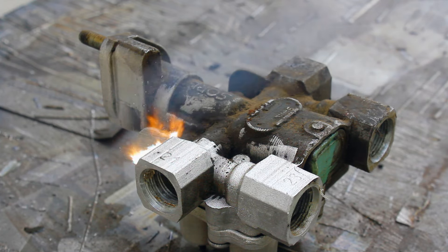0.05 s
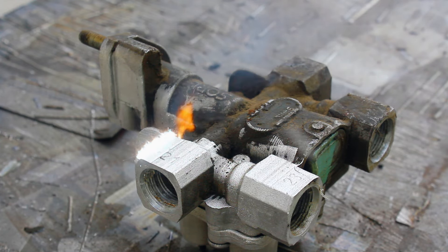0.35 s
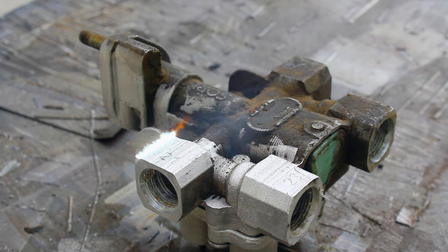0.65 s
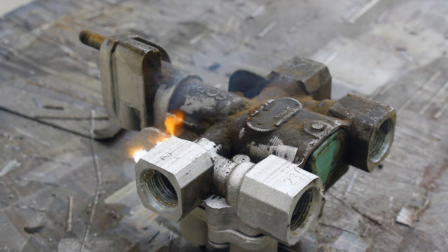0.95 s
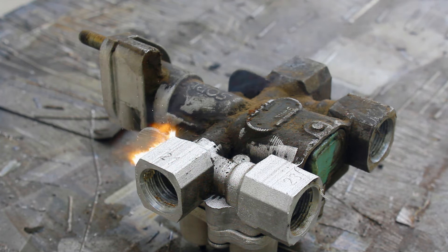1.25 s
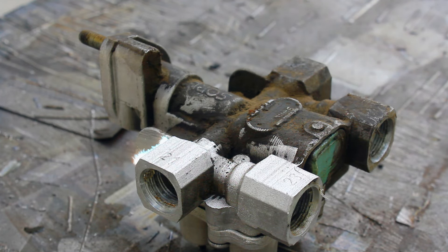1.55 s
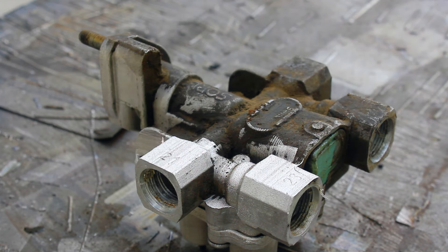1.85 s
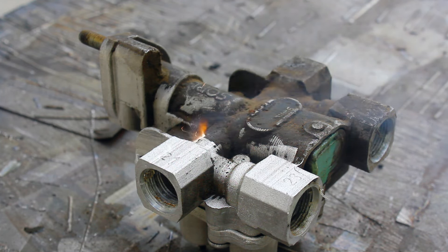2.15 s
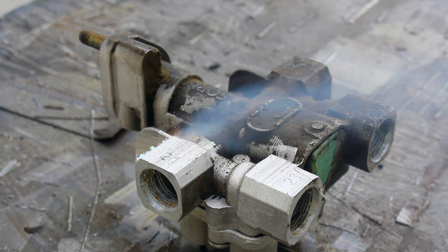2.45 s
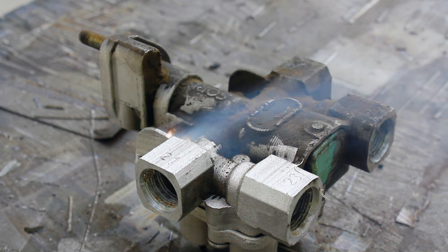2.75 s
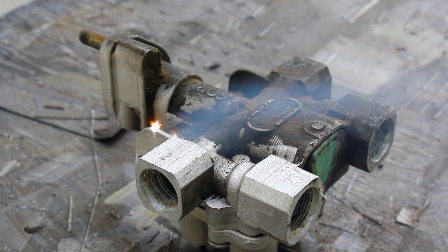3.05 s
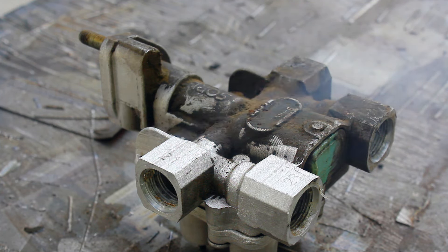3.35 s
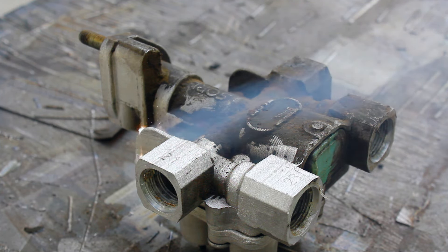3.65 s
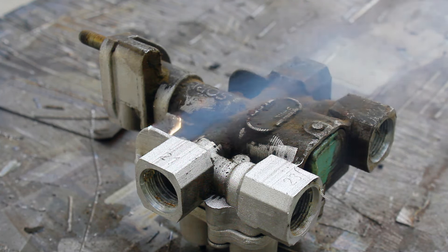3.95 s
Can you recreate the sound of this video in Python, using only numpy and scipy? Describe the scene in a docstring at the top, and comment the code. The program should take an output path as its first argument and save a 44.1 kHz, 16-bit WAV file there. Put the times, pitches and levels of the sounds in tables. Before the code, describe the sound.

Close, buzzing sizzle of a laser burning rust off metal, pausing briefly midway.

```python
"""A bright sizzle and a harsh buzz, close by: a pulsed laser strips rust and paint from a metal valve.
The beam sweeps to and fro 137 times a second. The coating sizzles in tiny bursts, and its vapour pushes
the air on every sweep, making the buzz. Thick spots flare with two puffs per sweep, among sharp cracks.
Midway the beam slips off the valve for a moment, leaving faint ticks and the cooling fan."""
import sys
import numpy as np
from scipy import signal
from scipy.fft import rfft, irfft
from scipy.io import wavfile
from scipy.ndimage import map_coordinates

SR = 44100
rng = np.random.default_rng(int(sys.argv[2]) if len(sys.argv) > 2 else 0)


def dump_mix(stems):
    """Bounce the given channels to the path in sys.argv[1] as a 16-bit WAV at rate SR."""
    frames = np.atleast_2d(stems).T  # one column per channel
    limited = np.clip(frames, -1, 1)  # hard clip at full scale
    pcm = np.round(limited * 32767).astype(np.int16)
    wavfile.write(sys.argv[1], SR, pcm)


N = 176400
T = np.arange(N) / SR
HZ = np.fft.rfftfreq(N, 1 / SR)
SWEEP_HZ = 136.92

# How strongly the coating sizzles. Each row: time in seconds, level in dB.
SIZZLE_LEVEL = [(0, -24), (.03, -24.5), (.1, -20), (.15, -20.5), (.18, -24.5), (.229, -25), (.24, -20),
                (.26, -19), (.31, -21.5), (.34, -23.5), (.365, -20), (.4, -24.5), (.415, -19.5), (.45, -22),
                (.465, -23.5), (.48, -21), (.497, -27), (.51, -18.5), (.55, -27), (.562, -16), (.577, -27),
                (.595, -22), (.62, -21.5), (.635, -26.5), (.66, -18), (.69, -27.5), (.71, -22),
                (.745, -26.5), (.78, -24), (.83, -26.5), (.865, -22), (.89, -25), (.94, -26), (.975, -26),
                (.99, -26.5), (1.01, -20.5), (1.09, -22), (1.14, -27), (1.17, -22.5), (1.26, -25),
                (1.285, -34.5), (1.33, -33), (1.37, -42), (1.385, -33), (1.395, -19), (1.41, -26),
                (1.45, -24.5), (1.498, -32.5), (1.515, -23.5), (1.57, -27), (1.597, -50.5), (1.7, -49),
                (1.76, -85), (1.83, -72), (1.852, -45.5), (1.875, -30), (1.895, -26), (1.945, -31.5),
                (1.965, -28), (2.0, -26), (2.08, -26.5), (2.155, -31), (2.19, -27), (2.23, -26),
                (2.28, -31), (2.325, -30), (2.35, -37.5), (2.41, -31.5), (2.46, -30), (2.48, -23),
                (2.51, -31), (2.6, -31.5), (2.665, -35), (2.7, -36), (2.75, -36.5), (2.79, -31.5),
                (2.83, -38), (2.88, -30), (2.93, -26), (3.0, -31), (3.018, -36.5), (3.06, -29.5),
                (3.11, -40.5), (3.17, -37.5), (3.22, -27.5), (3.265, -31.5), (3.31, -36), (3.34, -58),
                (3.37, -45), (3.4, -33), (3.425, -31.5), (3.48, -29.5), (3.515, -41), (3.57, -28),
                (3.61, -32), (3.652, -39), (3.68, -32), (3.73, -28.5), (3.77, -36.5), (3.85, -37),
                (3.9, -37), (3.93, -25.5), (3.98, -37), (4, -35)]
# The beam moves from a nut's flat face to its edge. Each row: time in seconds, share of the edge.
EDGE_SHARE = [(1.6, 0.071), (2.3, 1)]
# The bright tone of spits, snaps and pops. Each row: frequency in Hz, level in dB.
SPIT_TONE = [(300, -11.5), (1200, -13.5), (3000, 0), (4600, -4.5), (5700, -2.5), (7000, -4.5), (9000, 0.5),
             (11000, -5), (13000, 6), (15500, -0.5)]


def amp(db):
    """Turns decibels into a gain."""
    return 10 ** (np.asarray(db) / 20)


def curve(points):
    """Joins rows of time and value with straight lines."""
    return np.interp(T, *np.transpose(points))


def unit(x):
    """Scales a sound to an average (rms) size of 1."""
    return x / np.sqrt(np.mean(x ** 2) + 1e-20)


def band_unit(x, lo_hz, hi_hz):
    """Scales a sound so that one frequency band has size 1."""
    band = irfft(rfft(x) * ((HZ > lo_hz) & (HZ < hi_hz)), N)
    return x / np.sqrt(np.mean(band ** 2) + 1e-20)


def colour(x, points, size=4096):
    """Shapes a sound's tone to follow rows of Hz and dB."""
    table_hz, db = np.transpose(points)
    hz = abs(np.fft.fftfreq(size, 1 / SR))
    log_gain = np.log(amp(np.interp(np.log(hz + 1), np.log(table_hz + 1), db)) + 1e-6)
    taps = np.fft.ifft(np.exp(np.conj(signal.hilbert(log_gain)))).real[:size // 2]
    return signal.oaconvolve(x, taps / np.linalg.norm(taps))[:N]


def cut_lows(x, hz, order=2):
    """Turns down everything below hz."""
    return signal.sosfilt(signal.butter(order, hz, "high", fs=SR, output="sos"), x)


def wander(rate_hz):
    """A smooth random drift of size 1."""
    return unit(irfft(rfft(rng.standard_normal(N)) * np.exp(-(HZ / rate_hz) ** 2), N))


def add(mix, start_s, sound):
    """Mixes a sound in at a given time."""
    part = mix[max(round(start_s * SR), 0):][:len(sound)]
    part += sound[:len(part)]


def scatter(x, decay_s):
    """A blur of echoes that dies away."""
    t = T[:SR // 4]
    taps = rng.standard_normal(len(t)) * np.exp(-t / decay_s) * (1 - np.exp(-t / 0.003))
    return signal.oaconvolve(x, taps / np.linalg.norm(taps))[:len(x)]


def coating(change_s, places):
    """Random thickness along the sweep, met again each time and renewed as the beam creeps on."""
    thickness = rng.standard_normal((1000, places))
    beam_place = T * SWEEP_HZ % 1 * places
    return unit(map_coordinates(thickness, [T / change_s, beam_place], order=3, mode="grid-wrap"))


def valve_echoes(x, drift_s=0.000128, drift_hz=6.2):
    """Adds echoes off the valve, which shift as the beam travels."""
    # Each row: delay in seconds, gain.
    faces = [(.00065, 0.11), (.0013, -0.5), (.0021, 0.59)]
    echoes = np.zeros(N)
    for delay, gain in faces:
        lag = SR * (delay + drift_s * wander(drift_hz))
        echoes += gain * map_coordinates(x, [np.arange(N) - lag], order=3)
    return x + echoes


def sizzle(patch_db=4.0, grain_db=-0.5, flicker_db=0.43):
    """Countless tiny bursts, louder wherever the sweep meets thicker coating."""
    # The tone on the nut's face and on its edge. Each row: frequency in Hz, level in dB.
    face_tone = [(900, -37), (1600, -17.5), (2200, -11.5), (2500, -5), (2800, -10), (3050, -16.5),
                 (3800, -11), (4100, -19.5), (4500, -14), (5100, -3), (5600, -10), (6500, -11.5),
                 (7800, -5), (9700, -6), (12000, -2.5), (13700, 2.5), (14700, 3.5), (15700, -1)]
    edge_tone = [(900, -23), (1600, -9.5), (1950, -14.5), (2220, -5), (2450, -8.5), (2700, -5.5), (3500, 1),
                 (4100, -4.5), (4800, -12.5), (5450, 0), (6300, -7), (7200, -4.5), (8100, -2.5), (8900, 3),
                 (9700, -5), (11200, 3.5), (12200, 3), (13200, 5), (14300, 2.5), (15600, 5.5)]
    burst_db = patch_db * coating(0.06, places=9) + grain_db * wander(2550) + flicker_db * wander(40)
    bursts = valve_echoes(cut_lows(rng.standard_normal(N) * amp(burst_db), hz=1710))
    face, edge = (band_unit(colour(bursts, tone), 9000, 16000) for tone in (face_tone, edge_tone))
    share = curve(EDGE_SHARE)
    return amp(curve(SIZZLE_LEVEL)) * ((1 - share) * face + share * edge)


def crackle(per_second=70, spread_db=3, decay_s=0.00027):
    """Small specks pop at random, louder when the sizzle is strong."""
    sizes = amp(spread_db * np.minimum(rng.exponential(1, N), 3))
    kicks = sizes * (rng.random(N) < per_second / SR)
    fades = signal.lfilter([1], [1, -np.exp(-1 / (SR * decay_s))], kicks)
    return colour(fades * rng.standard_normal(N) * amp(curve(SIZZLE_LEVEL)), SPIT_TONE)


def plume(roughness=0.53, patch_db=3.0, face_db=-1, edge_db=-5):
    """Vapour pushes the air in nearly the same pattern on every sweep: a harsh buzz."""
    # The push, and its dip while the beam is off the valve. Each row: time in seconds, level in dB.
    push_level = [(0.0, -39.5), (0.13, -39.5), (0.22, -59.5), (0.26, -39.5), (0.43, -48.5), (0.47, -56),
                  (0.48, -36.5), (0.5, -57), (0.58, -54.5), (0.6, -36), (0.7, -52.5), (0.89, -49),
                  (0.93, -37.5), (0.99, -43.5), (1.01, -30.5), (1.05, -55), (1.11, -40), (1.15, -53.5),
                  (1.18, -39), (1.2, -50), (1.26, -41), (1.32, -42), (1.35, -58), (1.38, -63.5),
                  (1.39, -35), (1.49, -61.5), (1.57, -43), (1.59, -67), (1.86, -60), (1.89, -31),
                  (1.95, -63), (1.96, -33), (2.0, -46), (2.12, -53), (2.33, -43), (2.35, -63),
                  (2.37, -45.5), (2.48, -45.5), (2.64, -38), (2.66, -72), (2.67, -45), (2.81, -46.5),
                  (2.93, -38), (2.99, -53), (3.01, -58), (3.05, -39.5), (3.09, -51.5), (3.16, -55.5),
                  (3.24, -36), (3.34, -62), (3.43, -39), (3.51, -45.5), (3.56, -41.5), (3.62, -51),
                  (3.71, -48), (3.78, -53), (3.88, -48.5), (3.91, -44), (3.98, -47.5), (4.0, -39)]
    off_valve_dip = [(1.58, 0.5), (1.61, -43), (1.84, -27), (1.865, 0)]
    # Each row: frequency in Hz, level in dB.
    buzz_tone = [(120, -35.5), (200, -0.5), (274, -4), (410, -7), (548, 2), (684, 1.5), (820, 0), (1095, 1),
                 (1330, -7.5), (1800, -2), (2200, -10), (2480, 9.5), (2900, -1.5), (3400, -8), (3850, 7.5),
                 (4400, -12.5), (5150, 3), (6500, -1.5), (9000, -25.5), (15000, -28)]
    push = coating(0.09, places=320) + roughness * rng.standard_normal(N)
    push *= amp(patch_db * coating(0.065, places=8))
    buzz = band_unit(colour(cut_lows(push, hz=190), buzz_tone), 230, 1090)
    place_db = face_db + (edge_db - face_db) * curve(EDGE_SHARE)
    return buzz * amp(curve(push_level) + curve(off_valve_dip) + place_db)


def flame():
    """A tall flame throbs on each stroke of the beam, humming at twice the sweep rate."""
    # Each row: time in seconds, level in dB.
    hum_level = [(0, -39), (.04, -51), (.11, -39), (.16, -51), (.21, -84), (.26, -49), (.33, -46),
                 (.42, -51), (.5, -88)]
    hum = np.sqrt(2) * np.sin(4 * np.pi * SWEEP_HZ * T + 0.3 * wander(23))
    return amp(curve(hum_level)) * hum * (T < hum_level[-1][0])


def fan(rush_db=-55, sway_db=2.0, whine_hz=4027, whine_db=-68):
    """The low rush of the cooling fan, with a thin whine."""
    # Each row: frequency in Hz, level in dB.
    rush_tone = [(20, -27.5), (60, -16), (110, -10), (170, -4), (300, -12), (600, -15), (1000, -15.5),
                 (2000, -21.5), (4200, -22.5), (6000, -34), (15000, -41.5)]
    rush = unit(colour(rng.standard_normal(N), rush_tone)) * amp(rush_db + sway_db * wander(36))
    return rush + amp(whine_db) * np.sqrt(2) * np.sin(2 * np.pi * whine_hz * T)


def flares(rise_s=0.0065, fall_s=0.012, spit_s=0.00038, spit_fade_s=0.047):
    """The beam crosses a thick spot going out and coming back: it spits first, then burns in puffs."""
    # Each row: start and length in seconds, puff and spit levels in dB,
    # delay of the return stroke in seconds, ring of the puffs in Hz.
    thick_spots = [(.003, 0.067, -33, -31, 0.0012, 2580), (.352, 0.035, -40.5, -27.5, 0.0011, 2530),
                   (0.642, 0.028, -38, -27, 0.0013, 2500), (.7015, 0.028, -42, -23.5, 0.0011, 2500),
                   (0.845, 0.029, -55, -28.5, 0.00124, 2500), (0.914, 0.048, -37, -42, 0.00091, 990),
                   (1.01, 0.023, -31.5, -46, 0.00058, 2530), (1.229, 0.087, -37, -25, .0028, 3020),
                   (1.8738, 0.04, -32.5, -29, .0012, 2800), (1.9065, 0.03, -29, -42, 0.0024, 2870),
                   (2.1667, 0.018, -31, -26, .0011, 2780), (2.253, .08, -30, -36, 0.0025, 2850),
                   (2.3574, 0.027, -25.5, -28, .0025, 2880), (2.522, 0.072, -37, -30, .0024, 2880),
                   (2.6088, 0.029, -23, -25, .0025, 3040), (2.6708, 0.033, -32.5, -28, 0.0026, 3070),
                   (2.8415, 0.13, -35, -27.5, 0.0026, 2270), (2.8988, 0.084, -28, -38, 0.0022, 2540),
                   (3.015, 0.053, -31.5, -49.5, 0.0032, 2500), (3.1103, .008, -38.5, -29.5, 0.0023, 2350),
                   (3.177, 0.075, -36, -29.5, 0.002, 3400), (3.202, 0.059, -30.5, -33, .0022, 2580),
                   (3.36, 0.06, -42, -33.5, .0023, 3650), (3.4042, 0.048, -25.5, -24, 0.0024, 3060),
                   (3.5202, 0.077, -34, -25.5, .0023, 3300), (3.6593, 0.077, -33, -25, 0.003, 3150),
                   (3.866, 0.021, -43, -27.5, .0023, 3450), (3.9, 0.019, -33.5, -26.5, 0.0028, 3380),
                   (3.987, 0.022, -28.5, -22.5, 0.002, 3420)]
    # Each row: frequency in Hz, level in dB.
    puff_tone = [(200, -31), (410, -7.5), (680, -2), (950, -7), (1220, 1.5), (1400, 3), (1650, -7.5),
                 (1790, 2), (1930, -5.5), (2200, 0.5), (2600, 0), (2900, -2.5), (3250, 0), (3700, 0),
                 (4100, -4), (4700, -20), (6000, -23.5), (9000, -1.5), (15000, -23)]
    out_gain, ring_gain, uneven_db, jitter_s = 0.73, 1.8, 1.5, 0.000008
    puffs, spits = np.zeros(N), np.zeros(N)
    t = T[:256]
    scale = np.sqrt(SR / SWEEP_HZ / (1 + out_gain ** 2))
    for start, length, puff_db, spit_db, return_s, ring_hz in thick_spots:
        train = np.zeros(SR // 4)
        for age in np.arange(22) / SWEEP_HZ:
            burn = scale * np.exp(-max(age - length, 0) / fall_s)
            swell = 1 - np.exp(-(age + 0.5 / SWEEP_HZ) / rise_s)
            for delay, gain in ((0, out_gain), (return_s, 1)):
                at = abs(age + delay + jitter_s * rng.standard_normal())
                size = burn * gain * amp(uneven_db * rng.standard_normal())
                between_samples = at * SR - round(at * SR)
                pulse = np.sinc(np.arange(-8, 9) - between_samples) * np.hanning(17)
                add(train, at, size * swell * pulse)
                spit = rng.standard_normal(len(t)) * np.exp(-t / spit_s)
                spit /= np.linalg.norm(spit)
                add(spits, start + at, size * amp(spit_db) * np.exp(-age / spit_fade_s) * spit)
        train += amp(-10) * scatter(train, decay_s=0.015)  # each spot has its own echoes
        ring = signal.lfilter(*signal.iirpeak(ring_hz, Q=3.5, fs=SR), train)
        add(puffs, start, amp(puff_db) * (train + ring_gain * ring) / (1 + ring_gain / 2))
    return cut_lows(colour(puffs, puff_tone) + colour(spits, SPIT_TONE), hz=218)


def snaps():
    """Short bright cracks, and faint ticks in the pause."""
    # Each row: start in seconds, level in dB, fade time in seconds.
    cracks_and_ticks = [(0.2335, -20.5, 0.0046), (0.4748, -17, 0.0027), (0.5034, -34, 0.0031),
                        (0.561, -36, 0.0044), (0.589, -25, 0.0026), (0.6435, -29, .005),
                        (1.0101, -31, .003), (1.3916, -23, 0.0044), (1.511, -31, 0.0052),
                        (1.718, -33.5, 0.0017), (1.8362, -36, 0.0012), (1.896, -13, .002),
                        (1.954, -13.5, 0.0052), (2.0339, -15.5, 0.0027), (2.4249, -16.5, 0.0031),
                        (2.4681, -17, 0.0024), (2.6379, -33, 0.00092), (2.7574, -14.5, 0.0011),
                        (3.027, -17.5, .003), (3.3525, -26, 0.0012), (3.8642, -31, .002),
                        (3.5346, -15, 0.0017), (3.9108, -9.5, 0.0012)]
    cracks, t = np.zeros(N), T[:1200]
    for start, db, decay in cracks_and_ticks:
        add(cracks, start, amp(db) * rng.standard_normal(len(t)) * np.exp(-t / decay))
    return cut_lows(colour(cracks, SPIT_TONE), hz=1500, order=1)


def graze(tick_s=0.0019):
    """Off the valve, the beam grazes the bench and ticks faintly once per sweep."""
    # Each row: time in seconds, level in dB.
    tick_level = [(1.62, -58), (1.635, -46), (1.655, -39.5), (1.69, -46), (1.73, -52), (1.77, -76)]
    # Each row: frequency in Hz, level in dB.
    tick_tone = [(500, -24), (2500, -15), (3600, -10), (4450, 6), (5200, -11), (6500, -3), (7700, -21),
                 (9000, -12), (11000, -6.5), (12500, -20), (15000, -22)]
    ticks = rng.standard_normal(N) * np.exp(-(T % (1 / SWEEP_HZ)) / tick_s)
    grazing = (T > tick_level[0][0]) & (T < tick_level[-1][0])
    return unit(colour(ticks, tick_tone)) * amp(curve(tick_level)) * grazing


def scene(near_s=0.0013, near_db=-12.5, room_s=0.093, room_db=-21, width_db=-43.5):
    """All the sounds in a room with little echo; only the treble has some stereo width."""
    # Echoes off the bench and the valve. Each row: delay in seconds, gain.
    close_echoes = [(.00092, 0.16), (.00185, 0.26)]
    bursts = flares() + snaps()
    echoes = sum(gain * np.interp(T - delay, T, bursts, left=0) for delay, gain in close_echoes)
    echoes += amp(near_db) * scatter(bursts, near_s)
    work = bursts + echoes + sizzle() + crackle() + plume() + flame() + graze()
    room = amp(room_db) * scatter(work, room_s / np.log(1000))  # falls 60 dB in room_s
    mid = work + room + fan()
    side = amp(width_db) * cut_lows(scatter(work, near_s), hz=4250, order=10)
    return np.array([mid + side, mid - side])


def record(dry):
    """Removes the very highest treble."""
    taps = signal.firwin(601, cutoff=15800, window=("kaiser", 9), fs=SR)
    return signal.oaconvolve(dry, taps[None], "same", axes=1)


dry = scene()
out = record(dry)
dump_mix(out)
```